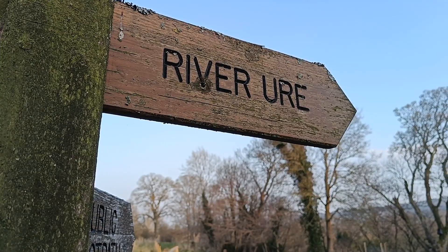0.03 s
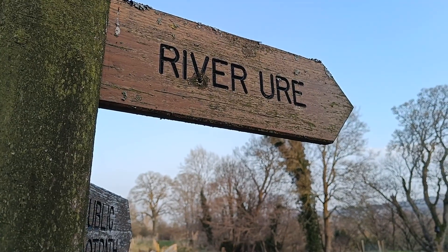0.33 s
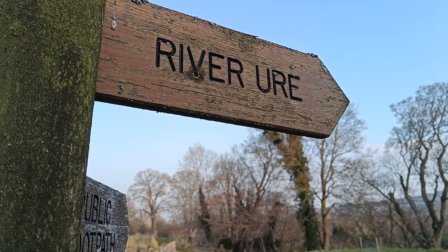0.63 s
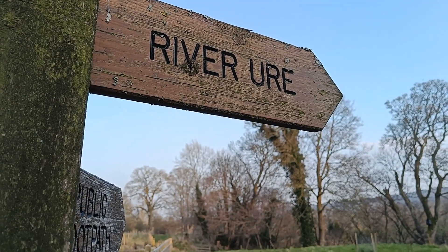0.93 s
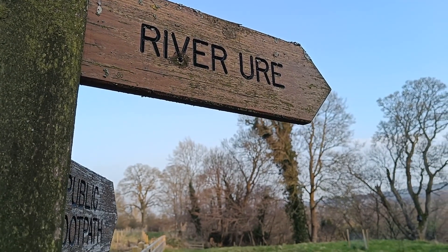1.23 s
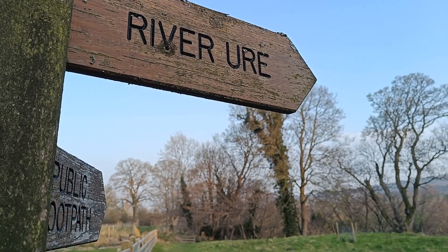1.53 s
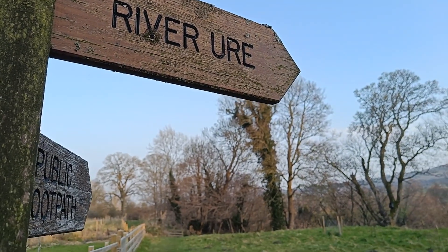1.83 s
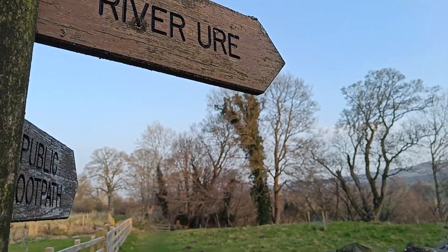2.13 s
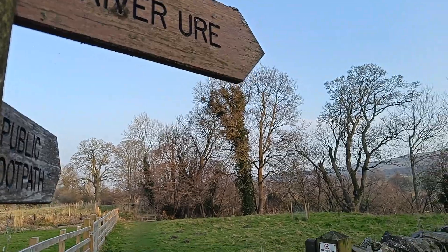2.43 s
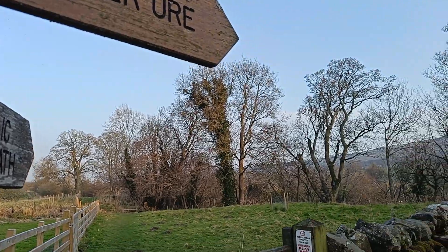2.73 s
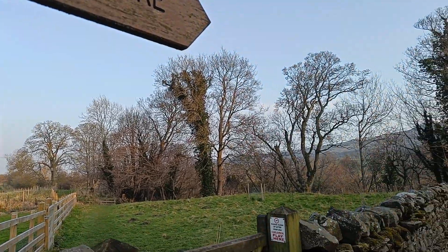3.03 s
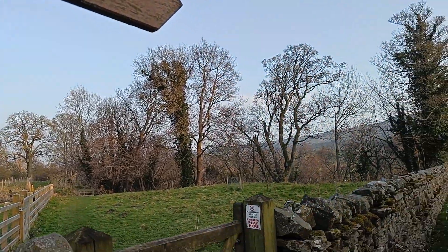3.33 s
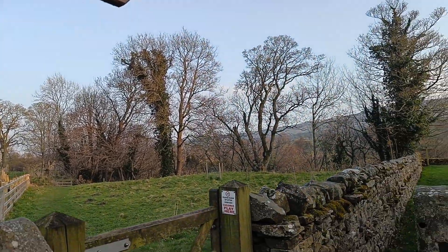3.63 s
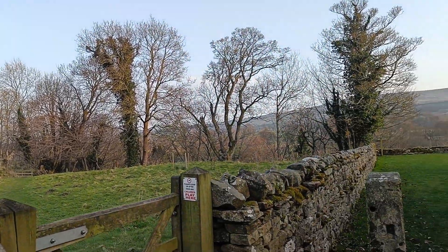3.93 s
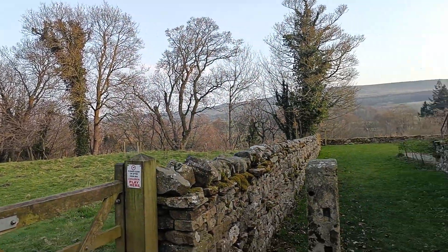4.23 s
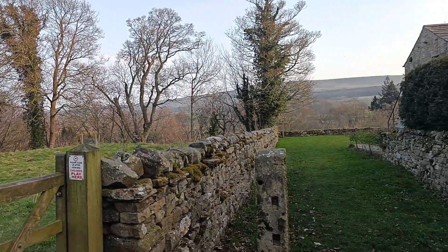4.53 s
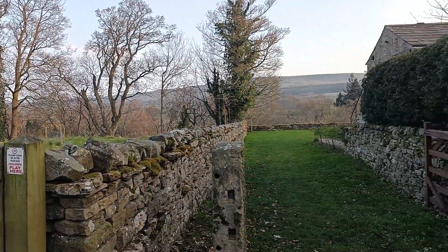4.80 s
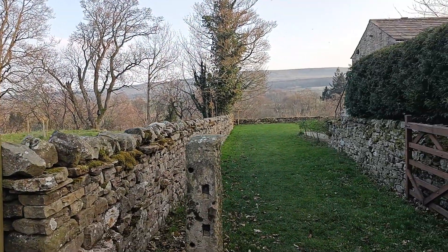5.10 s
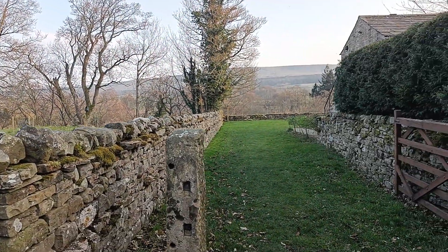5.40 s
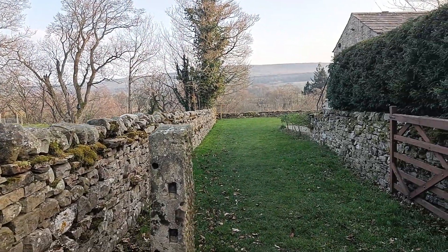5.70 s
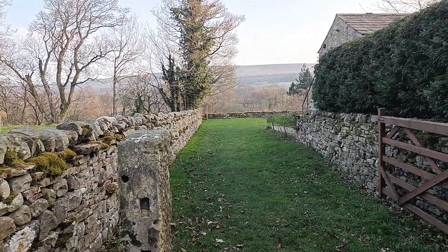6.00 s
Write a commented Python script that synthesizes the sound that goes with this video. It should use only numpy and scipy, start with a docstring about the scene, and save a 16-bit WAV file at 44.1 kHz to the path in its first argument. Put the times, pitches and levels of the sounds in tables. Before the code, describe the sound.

Small birds whistle and warble in quiet countryside, growing busier, with a few sharp clicks of fingers on the microphone near the end.

```python
"""Small birds sing along a country footpath on a still day; trees and stone walls scatter their notes back.
Far swoops, pips and slurred whistles come first, with a stray finger tick or bump on the hand-held camera.
A near songbird creeps in on thin high notes, breaks into a quick warble and ends in a fading trill.
Under it the air swells and the grip rustles. Last, shifting fingers tick hard, press and rub
beside the camera's two microphone ports while a far bird whistles twice more."""
import sys
import numpy as np
from scipy import signal
from scipy.io import wavfile
from scipy.ndimage import uniform_filter1d

SR = 44100
rng = np.random.default_rng(int(sys.argv[2]) if len(sys.argv) > 2 else 0)


def wrap_up_sound(samples):
    """Save the sound to the file named by the first command line argument, as 16-bit audio."""
    columns = np.atleast_2d(samples).T
    # keep every value between -1 and 1, then stretch to whole-number steps
    tamed = np.clip(columns, -1, 1)
    steps = np.round(tamed * 32767).astype(np.int16)
    wavfile.write(sys.argv[1], SR, steps)


N = 267113
T = np.arange(N) / SR

# The near songbird; levels are ahead of its fader. Side is always left minus right.
# thin high whistles: t/s, length/s, start f/Hz, level/dB
THIN_WHISTLES = [(2.327, 0.077, 8100, -75), (2.635, 0.078, 7970, -66.5), (2.932, 0.18, 7956, -56),
                 (3.116, 0.134, 7980, -49.5), (3.304, 0.12, 7680, -52)]
# the unbroken slur that opens the warble: t/s, f/Hz, level/dB
OPENING_SLUR = [(3.500, 3570, -47), (3.523, 3160, -45.5), (3.556, 4180, -43), (3.571, 4050, -60),
                (3.580, 3570, -37.5), (3.597, 3120, -69.5), (3.608, 3820, -35.5), (3.622, 3105, -39.5),
                (3.657, 2740, -57), (3.677, 3376, -37.5), (3.69, 3280, -56)]
# upward scoops: t/s, length/s, start f/Hz, top f/Hz, level/dB
UP_SCOOPS = [(3.725, 0.016, 3930, 4350, -44.5), (3.789, 0.021, 3700, 3795, -35.5),
             (4.322, 0.026, 3630, 3882, -36), (4.438, 0.034, 2973, 3893, -37.5),
             (4.503, 0.013, 4050, 4278, -37), (4.721, 0.035, 3786, 4230, -40),
             (4.782, 0.0222, 2930, 3640, -45), (4.885, 0.026, 2620, 4200, -43.5),
             (4.903, 0.046, 4200, 4435, -46.5), (4.942, 0.041, 3300, 4220, -38.5),
             (5.095, 0.022, 4180, 4740, -48), (5.187, 0.017, 4400, 4810, -48.5)]
# downward flicks: t/s, length/s, top f/Hz, level/dB
DOWN_FLICKS = [(2.7, 0.024, 8040, -62.5), (3.227, 0.021, 8840, -52), (3.737, 0.011, 4006, -39.5),
               (4.073, 0.14, 8550, -49), (4.921, .03, 6310, -56), (4.973, 0.027, 5520, -47),
               (5.135, 0.019, 4280, -46)]
# two-voiced notes: t/s, length/s, lower f/Hz, lower level/dB, upper f/Hz, upper level/dB
TWO_VOICED = [(3.806, 0.16, 3275, -48, 3775, -46.5), (4.272, 0.041, 2975, -42.5, 3636, -43.5),
              (4.436, 0.022, 3080, -47, 4180, -51.5), (4.538, 0.049, 3893, -44, 4230, -52),
              (4.61, .046, 3740, -47, 4242, -47), (4.789, 0.043, 3651, -40, 4305, -49.5),
              (5.035, 0.031, 3230, -52.5, 4090, -53)]
# the warble turns scratchy, then eases: t/s, tremble/share of pitch
SONG_TREMBLE = [(4.65, 0.0048), (4.801, 0.025), (5.149, 0.035), (5.33, 0.014)]
# the ports shade each pitch differently: f/Hz, side/dB
SONG_PAN = [(3000, -2.5), (4500, -6), (8200, 5.5)]

# pitch shapes of the far calls: t/s into the call, f/Hz
SWOOP = [(0, 3440), (.045, 3240), (.066, 2300), (0.108, 2060), (.145, 2353), (.165, 2580), (.205, 2570)]
HOOK = [(0, 5600), (0.025, 5100), (.054, 5390), (.088, 6220), (0.152, 7430)]
RISE = [(0, 3300), (.035, 3536), (0.077, 3700), (.122, 4680), (0.166, 4736)]
FALL = [(0, 6220), (0.099, 5000), (0.201, 4830)]
LIFT = [(0, 3160), (0.081, 3920)]
SLIP = [(0, 6190), (0.058, 5500)]
SAG = [(0, 7500), (.06, 6960), (0.141, 6680)]
# cues for the slurred calls: t/s, pitch shape, level/dB
SLUR_CUES = [(0.63, FALL, -71), (1.398, HOOK, -60), (1.614, HOOK, -64), (1.933, RISE, -67.5),
             (2.206, SLIP, -67), (2.23, SAG, -73), (2.515, RISE, -62.5), (3.695, SLIP, -66),
             (4.084, LIFT, -58), (5.415, HOOK, -59), (5.637, HOOK, -60)]
# the swoop thins out in its steep fall: t/s into the call, relative level/dB
SWOOP_ENVELOPE = [(.04, -2), (.06, -12.5), (.088, -6.5), (0.121, -4), (.15, -13.5)]
# held notes in the far trees: t/s, length/s, f/Hz, level/dB
TREE_NOTES = [(0.081, 0.057, 4550, -67), (0.158, 0.031, 4010, -56), (0.185, 0.018, 4450, -57),
              (0.242, 0.041, 3846, -59.5), (0.892, 0.068, 4210, -61.5), (0.973, 0.22, 4176, -71.5),
              (3.851, 0.15, 4240, -67.5), (3.854, 0.11, 2202, -73)]
# a low fluting song behind the warble: t/s, f/Hz, level/dB ahead of its fader
FLUTING_LINE = [(4.41, 2194, -57), (4.5, 2107, -58), (4.53, 2317, -56), (4.68, 2143, -62),
                (4.76, 2160, -82.5), (4.82, 2240, -55), (4.88, 2350, -65.5), (4.93, 2128, -55),
                (4.98, 2733, -59)]
# one far bird's pips: t/s, level/dB
PIP_CUES = [(1.439, -68.5), (1.577, -66), (1.716, -68.5), (1.978, -65)]
# decay of the echoes off trunks and walls: f/Hz, t60/s
ECHO_DECAY = [(2000, 0.46), (8000, 0.4)]

# fingernail ticks, some in quick runs: t/s, level/dB before filtering, brightness f/Hz, side/dB
NAIL_TICKS = [ (0.3716, -25, 4500, -24), (0.6211, -27.5, 3700, -30), (4.708, -28.5, 2030, -26),
              (5.4975, -7.5, 1920, -30), (5.4999, -7, 2280, -30), (5.5017, -7.5, 2020, -22),
              (5.6128, -0.5, 6200, -28), (5.6144, -9.5, 2460, -23), (5.7040, -0.5, 4730, -24.5),
              (5.7054, -9, 1730, -27), (5.8620, -19.5, 8200, 29), (6.0260, -13, 5760, 42),
              (6.031, -15, 7550, 31)]
# fingertip presses after a tick: t/s, then level/dB of wobble, drag and pop
FINGER_PRESSES = [(.373, -59, -50.5, -60), (5.6142, -24, -46, -24), (5.7054, -23.5, -33, -24)]
# modes of the wobbling case: f/Hz, relative level/dB, t60/s
CASE_MODES = [(118, -0.5, 0.09), (48, -8.5, 0.13)]
# soft finger bumps: t/s, level/dB, f/Hz, scuff level/dB against the bump, side/dB
FINGER_BUMPS = [(1.133, -28, 137, -22, -28), (3.71, -31.5, 128, -19.5, -30),
                (4.440, -34.5, 130.5, -17.5, -29.5), (5.998, -27.5, 186, -20.5, 36)]
# skin sliding by the left port: t/s, level/dB
RUB_ENVELOPE = [(5.45, -63), (5.86, -59), (5.96, -45.5), (6.0, -51.5), (6.06, -56)]
# tone of that rub: f/Hz, relative level/dB
RUB_EQ = [(88, -42), (150, -23), (1140, -10.5), (1260, -6.5), (2180, -1), (5250, -16.5), (11500, -13),
          (16000, -26)]
# the grip's rustle: t/s, level/dB before filtering
GRIP_ENVELOPE = [(2.8, -101), (3.25, -69), (3.9, -82.5), (4.4, -71), (4.95, -69.5), (5.3, -83)]
# tone of the distant countryside: f/Hz, relative level/dB
AIR_EQ = [(20, -10.5), (55, 2), (120, 2.5), (190, -3), (700, -6.5), (2200, -10.5), (2900, -14.5),
          (7000, -19.5), (8800, -42), (12000, -31), (16000, -40)]
# its late swell: t/s, level/dB
AIR_ENVELOPE = [(0, -64.5), (4.0, -64.5), (6.06, -58.5)]


def songbird(fader_db=2.5, thin_top_hz=8050, flick_drop=0.22, upper_lag_s=0.033):
    """The lead voice: thin whistles, scoops, flicks, two-voiced notes and a trill, with their echoes."""
    rows = [(s, length, hz, thin_top_hz, db) for s, length, hz, db in THIN_WHISTLES] + UP_SCOOPS
    rows += [(s, length, hz, hz * (1 - flick_drop), db) for s, length, hz, db in DOWN_FLICKS]
    for s, length, lower_hz, lower_db, upper_hz, upper_db in TWO_VOICED:
        rows += [held(s, length, lower_hz, lower_db), held(s + upper_lag_s, length, upper_hz, upper_db)]
    song = notes(rows + trill(), SONG_PAN, SONG_TREMBLE, flutter_db=2.5, edge=0.19)
    song += phrase(OPENING_SLUR, side_db=-4.5, waver=0.009, flutter_db=3)
    return amp(fader_db) * woodland(port_lag(song, lag_s=0.00022), wet_db=-0.3, early_db=5)


def trill(start_s=5.123, period_s=0.0755, count=5, scoop_s=0.03, held_s=0.041, held_hz=4235):
    """Note rows for even, fading beats, each a low scoop and then a flat high note."""
    rows = []
    for beat in range(count):
        s, db = start_s + beat * period_s, -44.5 - 1.5 * beat
        rows.append((s, scoop_s, 3510, 3920, db))
        if beat < count - 1:  # the song stops on the low note
            rows.append((s + scoop_s, held_s, held_hz, held_hz, db))
    return rows


def held(s, length, hz, db, drift=0.0145):
    """The row for a held note that drifts slightly upward."""
    return s, length, hz * (1 - drift), hz * (1 + drift), db


def notes(rows, pan, tremble, flutter_db, edge, soft_s=0.0067, settle=2.14):
    """Plays gliding notes: rising ones climb fast and settle, falling ones slide evenly."""
    out = np.zeros((2, N))
    for s, length, start_hz, end_hz, db in rows:
        waver = np.interp(s, *np.transpose(tremble))
        to_go = np.linspace(1, 0, int(length * SR)) ** (settle if end_hz > start_hz else 1)
        note = whistle(end_hz + (start_hz - end_hz) * to_go, waver, flutter_db, edge + soft_s / length)
        add(out, s, panned(amp(db) * note, at_hz(pan, start_hz)))
    return out


def phrase(curve, side_db, waver, flutter_db):
    """One unbroken whistle along a curve of pitch and level."""
    out = np.zeros((2, N))
    times, hz, db = np.transpose(curve)
    t = T[(T >= times[0]) & (T < times[-1])]
    voice = whistle(np.interp(t, times, hz), waver, flutter_db, edge=0.06)
    add(out, times[0], panned(amp(np.interp(t, times, db)) * voice, side_db))
    return out


def whistle(contour_hz, waver, flutter_db, edge):
    """A bird's near-sine voice, trembling in pitch and level; edge is the share spent fading in and out."""
    t = T[:len(contour_hz)]
    hz = contour_hz * (1 + waver * wander(t, rate_hz=110))
    envelope = signal.windows.tukey(len(t), min(edge, 1)) * amp(flutter_db * wander(t, rate_hz=44.44))
    return unit(envelope * np.sin(2 * np.pi * np.cumsum(hz) / SR))


def far_birds(fluting_fader_db=-2.5):
    """Held notes, a twitter and a low fluting song, washed in echo from the far trees."""
    rows = [held(*row) for row in TREE_NOTES] + twitter()
    chorus = notes(rows, pan=[(2300, 3), (4200, -10.5)], tremble=[(0, 0.006)], flutter_db=2, edge=0.3)
    chorus += amp(fluting_fader_db) * phrase(FLUTING_LINE, side_db=-4, waver=0.02, flutter_db=0.5)
    return woodland(chorus, wet_db=2, early_db=13)


def twitter(start_s=0.125, span_s=0.055, low_hz=5800, high_hz=7900, chip_s=0.015, rise_hz=690, db=-72):
    """Note rows for a scratchy flurry of tiny rising chips that tends to climb as it goes."""
    rows = []
    for when, pitch in rng.random((9, 2)):
        top_hz = low_hz + (high_hz - low_hz) * (pitch + when) / 2
        rows.append((start_s + span_s * when, chip_s, top_hz - rise_hz, top_hz, db))
    return rows


def slurred_calls():
    """Far birds whistle short hooks, rises and falls, off to the right."""
    out = np.zeros((2, N))
    for s, shape, db in SLUR_CUES:
        add(out, s, panned(amp(db) * slur(shape, edge=0.55), side_db=-8))
    return woodland(out, wet_db=-5, early_db=8)


def slur(shape, edge):
    """One whistle bent smoothly through a few pitches."""
    times, hz = np.transpose(shape)
    contour = uniform_filter1d(np.interp(T[T < times[-1]], times, hz), size=600)
    return whistle(contour, waver=0.006, flutter_db=2.5, edge=edge)


def swoops(start_s=-0.13, period_s=0.5, count=3, echo_s=0.252, echo_top_hz=2610):
    """One bird swoops at a steady pace; the tree line slaps back only the low end."""
    out, call = np.zeros((2, N)), slur(SWOOP, edge=0.21)
    swoop = amp(-53.5 + np.interp(T[:len(call)], *np.transpose(SWOOP_ENVELOPE))) * call
    slapback = amp(-10) * filtered(swoop, echo_top_hz, "low", order=10)
    for s in start_s + period_s * np.arange(count):
        add(out, s, panned(swoop, side_db=-1))
        add(out, s + echo_s, panned(slapback, side_db=-9))
    return woodland(out, wet_db=-0.5, early_db=17.5, linger=1.8)


def pips(length_s=0.019, hz=2347, upper_hz=2960, upper_db=-9.5):
    """A far bird gives short, round pips on one pitch, with a faint second voice above."""
    rows = []
    for s, db in PIP_CUES:
        rows += [held(s, length_s, hz, db), held(s, length_s, upper_hz, db + upper_db)]
    calls = notes(rows, pan=[(hz, 5)], tremble=[(0, 0.004)], flutter_db=1.5, edge=0.6)
    return woodland(calls, wet_db=-9, early_db=10)


def woodland(x, wet_db, early_db, early_s=0.016, linger=1, echoes_per_s=2000):
    """Trunks and walls add sparse echoes: a strong early cluster, then a thin tail stretched by linger."""
    t = T[:SR]
    taps = rng.standard_normal((2, SR)) * (rng.random((2, SR)) < echoes_per_s / SR) * (t > 0.004)
    taps *= 1 + amp(early_db) * np.exp(-t / early_s)
    hz, age, spectrum = signal.stft(taps, SR)
    t60 = linger * at_hz(ECHO_DECAY, hz)[:, None]
    tail = signal.istft(spectrum * amp(-60 * age / t60), SR)[1]
    tail /= np.linalg.norm(tail, axis=1, keepdims=True)
    return x + amp(wet_db) * signal.fftconvolve(x, tail, axes=1)[:, :N]


def port_lag(x, lag_s):
    """A sound from the right reaches the left port a moment later."""
    delay = np.exp(-2j * np.pi * np.fft.rfftfreq(N, 1 / SR) * lag_s)
    return np.array([np.fft.irfft(np.fft.rfft(x[0]) * delay, N), x[1]])


def ticks(grit_s=0.00043, scrape_s=0.011, scrape_hz=4500, leak_hz=240, top_hz=11500):
    """A nail hits the case: a pressure spike, grit and a scrape; the port leaks, so the spike rebounds."""
    out, t = np.zeros((2, N)), T[:SR // 20]
    for s, db, bright_hz, side_db in NAIL_TICKS:
        spike = filtered(np.exp(-np.pi * bright_hz * t), 2 * bright_hz, "low")
        grains = filtered(rng.standard_normal(len(t)), 2 * bright_hz, "low")
        grit = 0.36 * grains * np.exp(-t / grit_s)
        scrape = amp(-23) * filtered(grains, scrape_hz, "low") * np.exp(-t / scrape_s)
        tick = filtered(spike / spike.max() + grit + scrape, leak_hz, "high", order=2)
        add(out, s, panned(amp(db) * tick / np.sqrt(2), side_db))
    return filtered(out, top_hz, "low", order=2)


def presses(press_s=0.0105, drag_hz=1500, pop_hz=513):
    """The case wobbles under the fingertip, which drags for a moment and then pops free."""
    out, t = np.zeros((2, N)), T[:SR // 6]
    wobble = -sum(amp(db - 60 * t / t60) * np.sin(2 * np.pi * hz * t) for hz, db, t60 in CASE_MODES)
    contact = np.sin(np.pi * np.minimum(t / (press_s + 1 / pop_hz), 1)) ** 0.5
    release = 2 * np.pi * pop_hz * (t - press_s)
    pop = -release * np.exp((1 - release ** 2) / 2)
    for s, wobble_db, drag_db, pop_db in FINGER_PRESSES:
        drag = contact * unit(filtered(rng.standard_normal(len(t)), drag_hz, "low"))
        press = amp(wobble_db) * wobble + amp(drag_db) * drag + amp(pop_db) * pop
        add(out, s, panned(press / np.sqrt(2), side_db=-30))
    return out


def bumps(ring_cycles=0.53, glide_s=0.0012, scuff_s=0.0079, scuff_hz=1100, knock_hz=700):
    """A fingertip pushes air into a port: a damped, dropping thump, a scuff and a dull knock of the case."""
    out, t = np.zeros((2, N)), T[:SR // 10]
    knock = amp(-13) * np.sin(2 * np.pi * knock_hz * t) * np.exp(-t / 0.0015)
    for s, db, hz, scuff_db, side_db in FINGER_BUMPS:
        cycles = np.cumsum(hz * (1 + np.exp(-t / glide_s))) / SR
        thump = -np.sin(2 * np.pi * cycles) * np.exp(-t * hz / ring_cycles)
        scuff = unit(filtered(rng.standard_normal(len(t)), scuff_hz, "low", order=2))
        scuff *= amp(scuff_db) * np.exp(-t / scuff_s)
        add(out, s, panned(amp(db) * (thump + scuff + knock), side_db))
    return out


def rub(grain_db=2.5, right_db=-6):
    """Skin slides over the case in a grainy hiss, mostly on the left."""
    level_db = np.interp(T, *np.transpose(RUB_ENVELOPE), left=-np.inf) + grain_db * wander(T, rate_hz=40)
    return noise(RUB_EQ, patchy_db=2) * amp(level_db) * amp([[0], [right_db]])


def grip_creep(flicker_hz=8, bright_hz=6000):
    """While the camera turns, the grip creeps: a soft, uneven rustle beside the right port."""
    flicker = unit(filtered(rng.standard_normal(N), flicker_hz, "low"))
    level_db = np.interp(T, *np.transpose(GRIP_ENVELOPE), left=-np.inf) + 4 * np.minimum(flicker, 2)
    return panned(amp(level_db) * filtered(rng.standard_normal(N), bright_hz, "low"), side_db=-9)


def air(crossfeed=0.12):
    """The bed: a faint wash from the open valley, partly common to both ports."""
    wash = noise(AIR_EQ, patchy_db=2.5)
    swell = amp(np.interp(T, *np.transpose(AIR_ENVELOPE)))
    return panned(unit(wash + crossfeed * wash[::-1]), side_db=-2) * swell


def noise(colour, patchy_db, size=2048):
    """Two unrelated channels of coloured noise with drifting patches."""
    hz = np.fft.rfftfreq(size, 1 / SR)
    real, imag, patches = rng.standard_normal((3, 2, len(hz), 2 * N // size + 3))
    patches = unit(uniform_filter1d(uniform_filter1d(patches, size=16, axis=1), size=4, axis=2))
    spectrum = (real + 1j * imag) * amp(at_hz(colour, hz)[:, None] + patchy_db * patches)
    return unit(signal.istft(spectrum, window="cosine")[1][:, :N])


def wander(t, rate_hz):
    """Smooth random modulation, rms about 1."""
    speeds, phases = rng.random((2, 10, 1))
    return np.sin(2 * np.pi * (2 * rate_hz * speeds * t + phases)).sum(0) / np.sqrt(len(speeds) / 2)


def amp(db):
    """Decibels to gain."""
    return 10 ** (np.asarray(db) / 20)


def unit(x):
    """Scales to rms 1."""
    return x / np.sqrt(np.mean(x ** 2) + 1e-20)


def at_hz(points, hz):
    """Reads a curve on a log-frequency axis."""
    f, value = np.transpose(points)
    return np.interp(np.log(hz + 1), np.log(f + 1), value)


def panned(x, side_db):
    """Constant-power pan; positive is left."""
    return unit(amp([[side_db / 2], [-side_db / 2]])) * x


def add(mix, s, sound):
    """Mixes a stereo sound in at time s; it may already be under way at time zero."""
    start = round(s * SR)
    sound = sound[:, max(-start, 0):]
    part = mix[:, max(start, 0):][:, :sound.shape[1]]
    part += sound[:, :part.shape[1]]


def filtered(x, hz, kind, order=1):
    """Low-pass or high-pass."""
    return signal.sosfilt(signal.butter(order, min(hz, SR / 2 - 1), kind, fs=SR, output="sos"), x)


def scene():
    """Birds up front, the hand on the camera, and the quiet valley behind."""
    birds = songbird() + far_birds() + slurred_calls() + swoops() + pips()
    hand = ticks() + presses() + bumps() + rub() + grip_creep()
    return birds + hand + air()


def record(dry, ceiling=0.75, top_hz=16400):
    """The microphones overload softly on the hardest ticks; a steep low-pass trims the top."""
    saturated = ceiling * np.tanh(dry / ceiling)
    low_pass = signal.firwin(511, top_hz, window=("kaiser", 9), fs=SR)
    return signal.oaconvolve(saturated, low_pass[None], "same")


dry = scene()
out = record(dry)
wrap_up_sound(out)
```